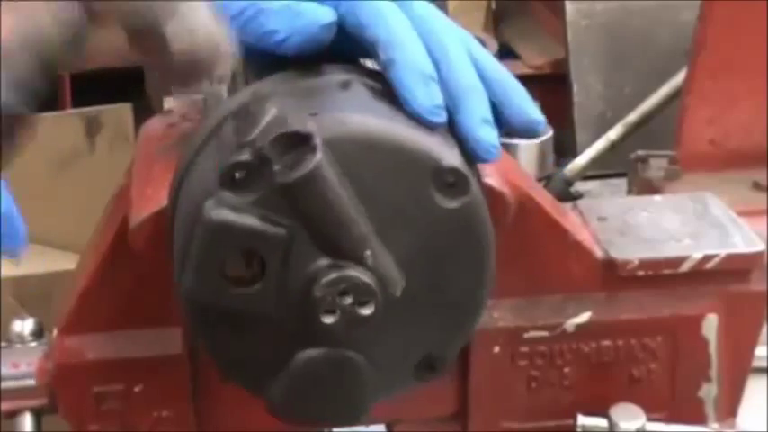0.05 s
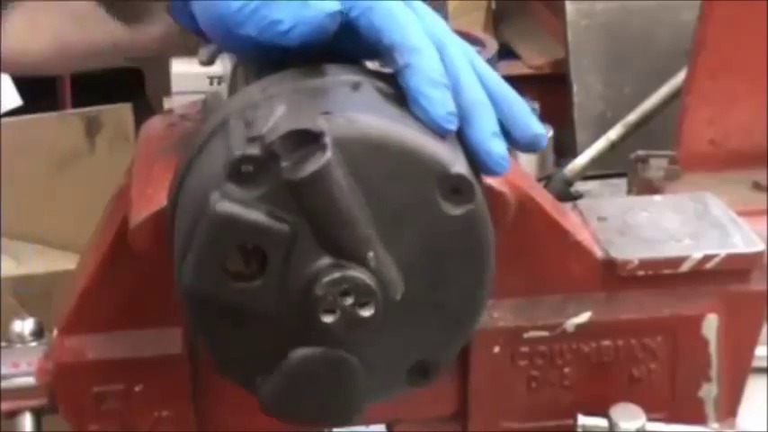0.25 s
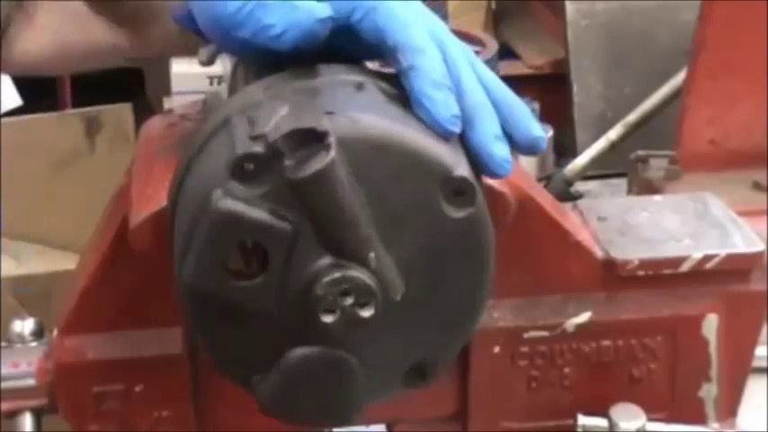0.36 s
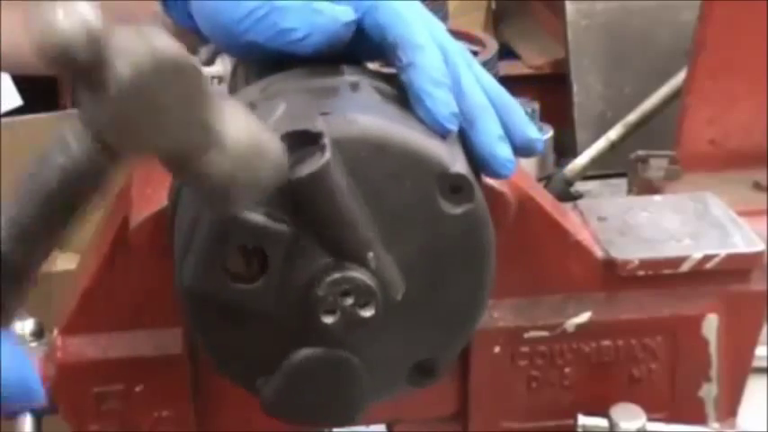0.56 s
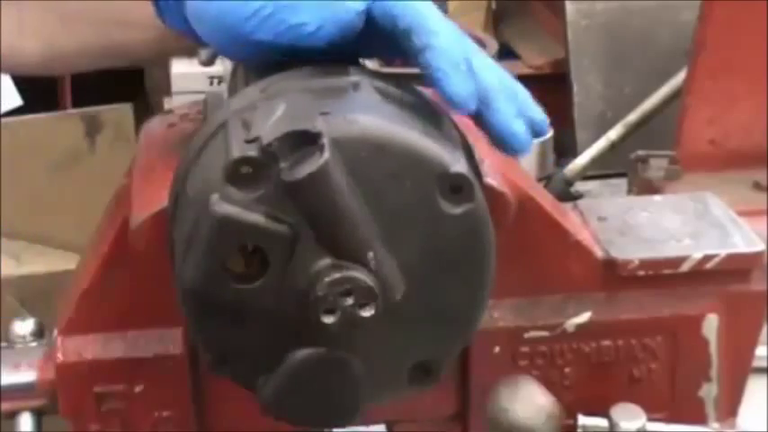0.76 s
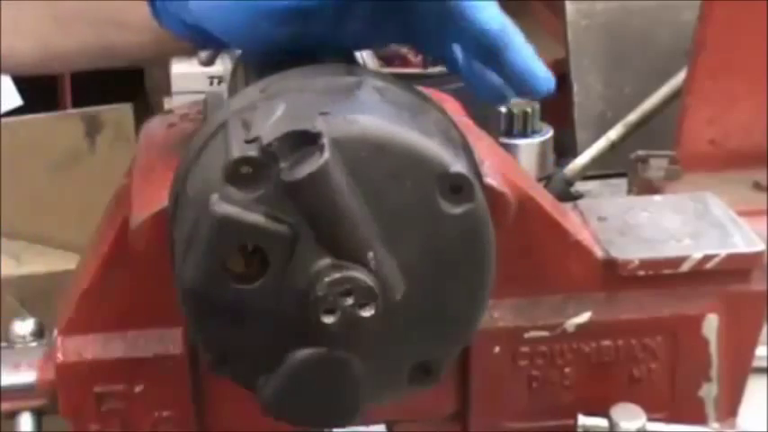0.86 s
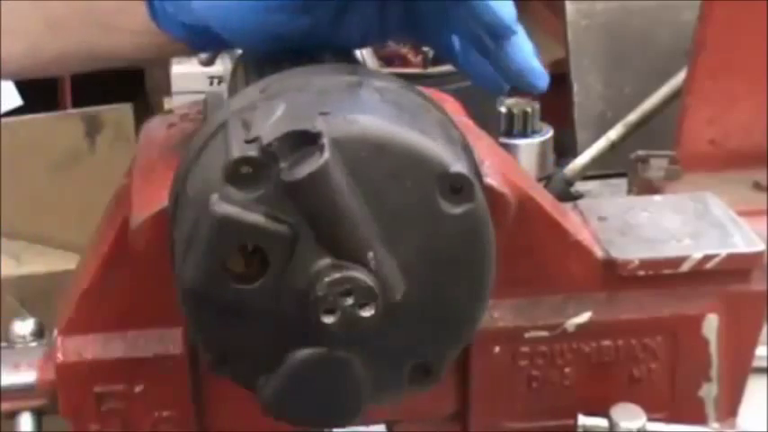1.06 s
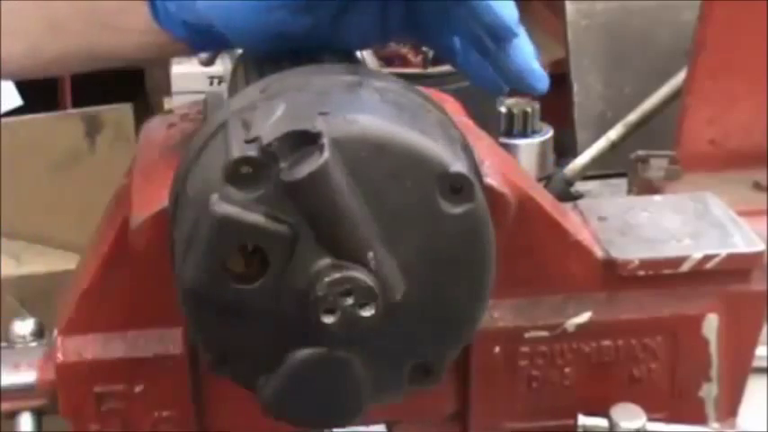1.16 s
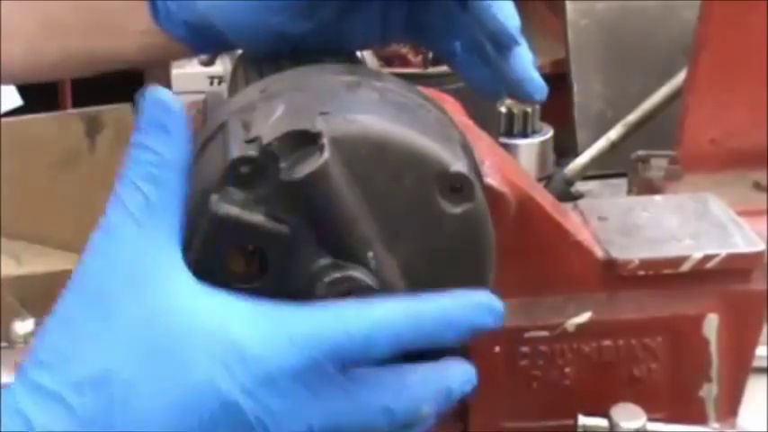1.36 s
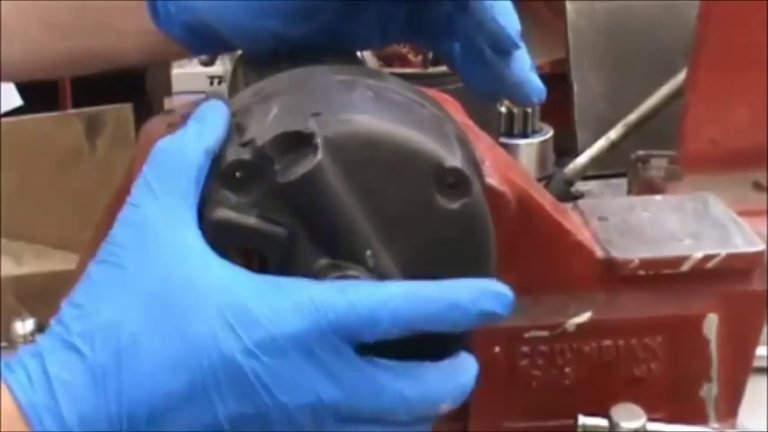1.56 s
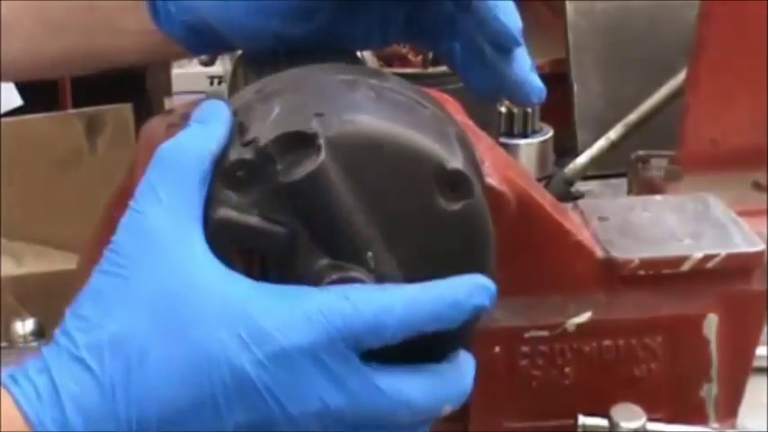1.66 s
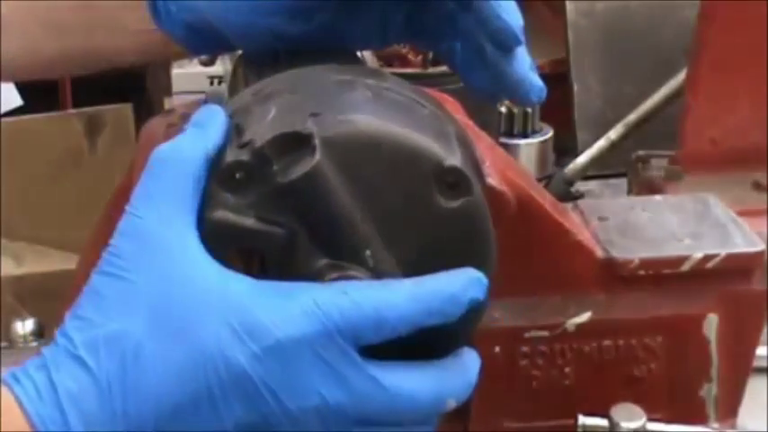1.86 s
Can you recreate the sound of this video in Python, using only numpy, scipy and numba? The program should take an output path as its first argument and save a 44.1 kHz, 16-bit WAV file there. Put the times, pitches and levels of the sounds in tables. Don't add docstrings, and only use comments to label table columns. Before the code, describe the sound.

Two hard metallic hammer blows on a cast housing, then the hammer set down and small ticks

```python
import sys
import numpy as np
from scipy import signal
from scipy.fft import rfft, irfft
from scipy.io import wavfile
from scipy.ndimage import uniform_filter1d
from numba import njit

SR = 44100
rng = np.random.default_rng(int(sys.argv[2]) if len(sys.argv) > 2 else 0)


def gain_from_db(level_db):
    decades = np.asarray(level_db, float) / 20
    return 10 ** decades


def persist_wave(psi):
    counts = np.round(np.clip(psi, -1, 1) * 32767).astype(np.int16)
    wavfile.write(sys.argv[1], SR, np.atleast_2d(counts).T)


N = 83790
LEAD = SR // 2
M = N + LEAD

# start_s, level_db
LANDING = (1.0952, -12.5)


def curve(hz, table):
    table = np.array(table)
    return np.interp(np.log(np.maximum(hz, 1)), np.log(table[:, 0]), table[:, 1])


def noise(colour, size):
    hz = np.fft.rfftfreq(size, 1 / SR)
    x = irfft(rfft(rng.standard_normal(size)) * gain_from_db(curve(hz, colour)), size)
    return x / x.std()


def add(out, start_s, x):
    i = LEAD + int(start_s * SR)
    out[i:i + len(x)] += x[:M - i]


def strike(t60_s):
    contact_s = .0012
    t = np.arange(int(1.5 * t60_s * SR)) / SR
    return t, np.exp(-np.log(1000) * t / t60_s) * (1 - np.exp(-t / contact_s))


def ring(start_s, level_db, modes):
    out = np.zeros(M)
    for hz, t60_s, mode_db in modes:
        t, env = strike(t60_s)
        add(out, start_s, gain_from_db(level_db + mode_db) * env * np.sin(2 * np.pi * hz * t))
    return out


def burst(start_s, level_db, colour, t60_s):
    out = np.zeros(M)
    env = strike(t60_s)[1][:8192]
    add(out, start_s, gain_from_db(level_db) * env * noise(colour, 8192)[:len(env)])
    return out


def walk(rate_hz):
    k = int(SR / rate_hz)
    steps = np.repeat(rng.standard_normal(M // k + 1), k)
    return 0.43 * uniform_filter1d(steps, k)[:M]


def housing():
    # start_s, level_db
    taps = [
        (-.33, -14.5),
        (.2345, 1),
        (.556, 4.5),
    ]
    casting_hz = [1304, 1780, 2855, 3255, 3810, 3960, 4866, 4950, 5070, 5200, 5770, 6210, 7530, 10530]
    # t60_s, first_two_taps_db, last_tap_db
    casting = [(0.16, -14, -12), (0.02, -1.5, -11), (.22, -11, -8), (0.025, 1, 0.5), (0.057, -7.5, -4),
               (0.049, -2, -10.5), (0.094, -10, 1), (0.19, -10, -10.5), (0.027, 15, 14), (0.028, -20, -20),
               (0.03, -8, -3.5), (0.047, -32, -9.5), (0.041, -9, -5.5), (0.048, -31.5, 3.5)]
    lip_hz = [9520, 9995, 10920, 11660, 12130, 12690, 13010, 14110]
    # t60_s, level_db
    lip = [(0.055, -28), (0.049, -35.5), (0.101, -31), (0.068, -18.5), (.1, -22), (0.15, -23), (.12, -34.5),
           (.12, -23.5)]
    # hz, db_per_hz
    crack = [(100, -12), (200, -3), (500, 0), (900, -7), (2500, 1.5), (5000, -0.5), (9000, -10),
             (14000, -18)]
    crack_db, crack_t60_s = 4.5, 0.027
    lip_modes = [(hz, *m) for hz, m in zip(lip_hz, lip)]
    out = np.zeros(M)
    for k, (start_s, level_db) in enumerate(taps):
        column = 1 + k // 2
        modes = [(hz, m[0], m[column]) for hz, m in zip(casting_hz, casting)]
        out += ring(start_s, level_db, modes + lip_modes)
        out += burst(start_s, level_db + crack_db, crack, crack_t60_s)
    return out


def shop():
    # hz, rms_db
    partials = [(86.1, -73.5), (129.2, -49), (242.2, -59.5), (360.7, -61), (479.1, -66.5), (721.4, -72.5),
                (1082, -71), (1141, -75.5)]
    # hz, db_per_hz
    air_colour = [(20, -15), (45, -2.5), (125, -3.5), (200, -10), (500, -21.5), (1500, -20), (5000, -25),
                  (15000, -37)]
    wobble_db, air_db = -2.5, -52.5
    t = np.arange(M) / SR
    hum = np.zeros(M)
    for hz, rms_db in partials:
        level = gain_from_db(rms_db + 1.5 + wobble_db * walk(24.14))
        hum += level * np.sin(2 * np.pi * (hz * t + rng.random()))
    air = [gain_from_db(air_db + 1.5 * walk(6.1)) * noise(air_colour, M) for _ in range(2)]
    return hum + air[0], air[1] + .4 * hum


def rubs():
    # start_s, length_s, level_db, centre_hz
    slides = [
        (-.03, 0.074, -57.5, 10600),
        (1.086, 0.018, -24, 3270),
        (1.108, .17, -30, 352),
        (1.5, 0.4, -46.5, 400),
        (1.496, 0.35, -46.5, 1980),
    ]
    out = np.zeros(M)
    for start_s, length_s, level_db, hz in slides:
        k = int(length_s * SR)
        grain = gain_from_db(level_db + 9.9 * walk(66.8)[:k])
        colour = [(hz / 3, -18), (hz, 0), (hz * 2, -10), (hz * 8, -40)]
        add(out, start_s, grain * np.hanning(k) * noise(colour, M)[:k])
    return out


def bench():
    # hz, t60_s, under_head_db, under_handle_db
    modes = [(186, 0.22, -44, -9), (218.5, 0.082, -10, -17.5), (306, 0.042, -0.5, -32),
             (330, 0.02, 14.5, -9), (500, 0.18, -10, -5), (543, 0.054, 2.5, -5.5), (622, 0.045, -10.5, 3),
             (690, 0.047, -18, -11), (847, 0.046, -14.5, -15), (997, 0.042, -4.5, -1.5)]
    # start_s, level_db
    slaps = [
        (1.2599, 2),
        (1.269, 0),
    ]
    # hz, db_per_hz
    clatter = [(100, -34), (180, 4), (500, 5), (1000, -2), (2500, -6.5), (5000, -15), (10000, -16.5),
               (15000, -14.5)]
    clatter_t60_s, land_clatter_db, slap_clatter_db = 0.042, 2.5, 3
    thud_s, thud_db, bang_db = 1.0925, -15.5, -4.5
    land_s, land_db = LANDING
    handle_modes = [(m[0], m[1], m[3]) for m in modes]
    out = burst(land_s, land_db + land_clatter_db, clatter, clatter_t60_s)
    out -= ring(thud_s, thud_db, [m[:3] for m in modes])
    for start_s, level_db in slaps:
        out -= ring(start_s, level_db + bang_db, handle_modes)
        out += burst(start_s, level_db + slap_clatter_db, clatter, clatter_t60_s)
    return out


def head():
    head_hz = [2530, 3575, 4673, 4780, 5539, 5674, 7289, 9292, 11100, 14420]
    # t60_s, level_db
    head_modes = [(.2, -8), (.17, 1), (.22, -9), (.3, -17), (.17, -6), (.42, -12), (.36, -12), (.2, -22),
                  (.06, -18), (.2, -28)]
    return ring(*LANDING, [(hz, *m) for hz, m in zip(head_hz, head_modes)])


def loose_part():
    # start_s, peak_db
    ticks = [
        (1.1624, -18),
        (1.4897, -22),
        (1.56, -19.5),
        (1.5922, -51),
        (1.6234, -24.5),
        (1.6538, -23),
        (1.6834, -39.5),
        (1.7062, -28.5),
        (1.733, -29),
    ]
    # hz, t60_s, level_db
    tick_modes = [(2200, .012, -3), (4200, .008, -6), (9800, .008, -2)]
    # hz, db_per_hz
    tick_colour = [(250, -3), (600, 8), (1500, 7.5), (4000, 0), (7000, -6.5), (9800, -8.5), (12000, -16),
                   (15500, -29)]
    tick_db, tick_t60_s, echo_s, echo_db = -4, 0.026, .0085, -6.5
    out = np.zeros(M)
    for start_s, peak_db in ticks:
        level_db = peak_db + tick_db
        out += ring(start_s, level_db, tick_modes)
        out += burst(start_s, level_db, tick_colour, tick_t60_s)
        out += burst(start_s + echo_s, level_db + echo_db, tick_colour, tick_t60_s)
    return out


def glove_knocks():
    # start_s, level_db
    knocks = [
        (1.522, -14),
        (1.7742, -18.5),
    ]
    # hz, t60_s, level_db
    knock_modes = [(600, .012, 0), (1050, .012, -2)]
    return sum(ring(start_s, level_db, knock_modes) for start_s, level_db in knocks)


def room(x):
    # hz, t60_s
    decay = [(150, .4), (500, .4), (1500, 0.39), (4000, 0.41), (9000, 0.36), (14000, 0.2)]
    room_db, rise_s, late_db, late_stretch = 2, 0.0024, -29, 2.01
    size = SR
    t, hz = np.arange(size) / SR, np.fft.rfftfreq(size, 1 / SR)
    white, tail = rfft(rng.standard_normal((2, size))), 0
    for centre_hz in 44 * 2 ** np.arange(0, 9, .5):
        octaves = np.log2(np.maximum(hz, 1) / centre_hz)
        band = np.cos(np.pi * np.clip(octaves, -.5, .5)) ** 2
        fall = np.log(1000) * t / curve(centre_hz, decay)
        env = np.exp(-fall) + gain_from_db(late_db) * np.exp(-fall / late_stretch)
        tail = tail + irfft(white * band, size) * env
    tail = tail * (1 - np.exp(-(t / rise_s) ** 2))
    tail = tail * gain_from_db(room_db) / np.sqrt(np.sum(tail ** 2) / 2)
    return signal.fftconvolve(x[None], tail, axes=1)[:, :M]


def widen(mid, side):
    # hz, level_db
    side_colour = [(60, -7.5), (110, -25), (200, -7.5), (380, -6), (700, -6), (1290, -8.5), (2380, -8.5),
                   (4400, -11.5), (8120, -13), (15000, 0.5)]
    right_db = 0.12
    side = irfft(rfft(side) * gain_from_db(curve(np.fft.rfftfreq(M, 1 / SR), side_colour)), M)
    return np.array([mid + side, (mid - side) * gain_from_db(right_db)])


def scene():
    mic_low_hz, head_room_db, small_room_db = 139, -12, -11
    thin = signal.butter(3, mic_low_hz, "high", fs=SR, output="sos")
    sources = [housing() + bench(), head(), loose_part() + glove_knocks() + rubs()]
    loud, steel, small = signal.sosfilt(thin, sources)
    direct, floor = loud + steel + small, shop()
    wet = room(loud + gain_from_db(head_room_db) * steel + gain_from_db(small_room_db) * small)
    mid = direct + wet[0] + floor[0]
    side = wet[1] + .5 * np.roll(direct, 40) + floor[1]
    return widen(mid, side)[:, LEAD:]


@njit
def follow(x, up, down):
    e, out = 0., np.empty(len(x))
    for i in range(len(x)):
        e += (x[i] - e) * (up if x[i] > e else down)
        out[i] = e
    return out


def top_cut(x):
    return signal.sosfilt(signal.butter(12, 16500, fs=SR, output="sos"), x)


def record(dry):
    limit_db, ratio, attack_s, release_s, ahead_s = -6, 6.8, 0.00021, 0.019, 0.0002
    clip, top_hz = .9, 15000
    up, down = 1 - np.exp(-1 / (attack_s * SR)), 1 - np.exp(-1 / (release_s * SR))
    level = follow(np.abs(dry).max(axis=0), up, down)
    level = np.maximum(level, np.roll(level, -int(ahead_s * SR)))
    x = dry * np.minimum(1, gain_from_db(limit_db) / (level + 1e-9)) ** (1 - 1 / ratio)
    low_pass = signal.cheby2(10, 30, top_hz + 300, fs=SR, output="sos")
    x = signal.sosfilt(low_pass, np.tanh(clip * x) / clip)
    return top_cut(x)


dry = scene()
out = record(dry)
persist_wave(out)
```